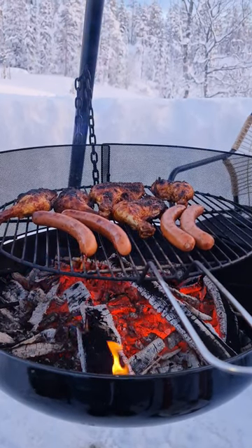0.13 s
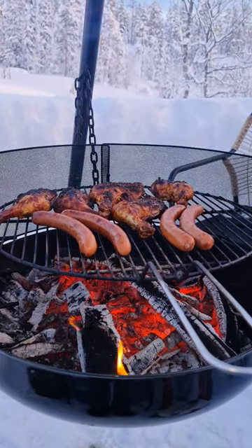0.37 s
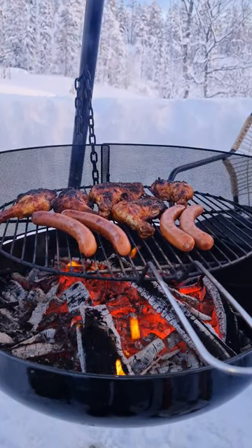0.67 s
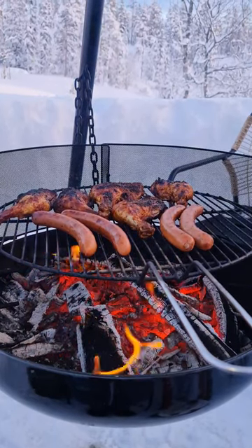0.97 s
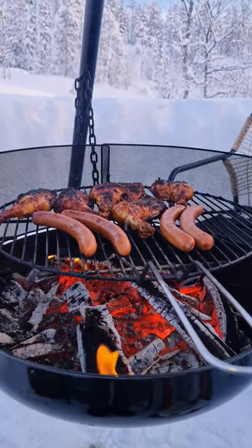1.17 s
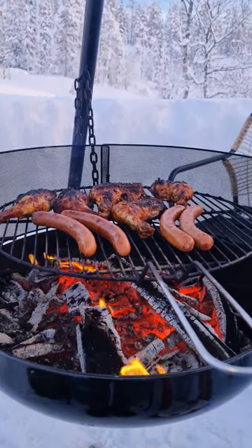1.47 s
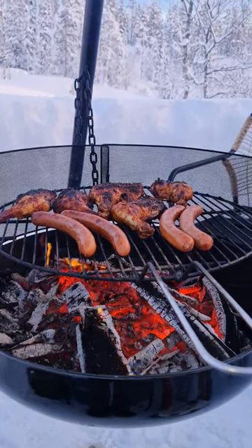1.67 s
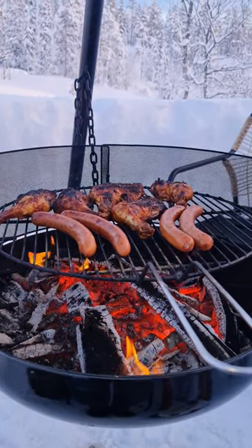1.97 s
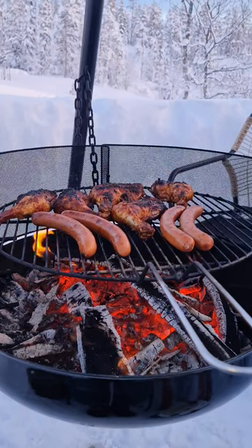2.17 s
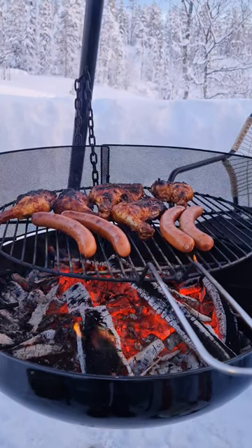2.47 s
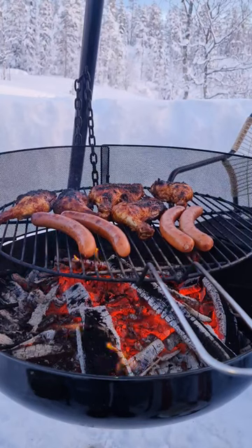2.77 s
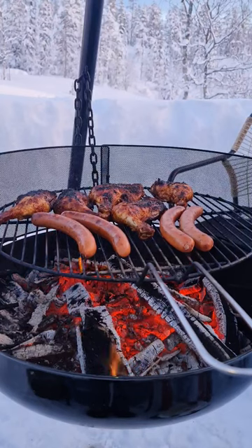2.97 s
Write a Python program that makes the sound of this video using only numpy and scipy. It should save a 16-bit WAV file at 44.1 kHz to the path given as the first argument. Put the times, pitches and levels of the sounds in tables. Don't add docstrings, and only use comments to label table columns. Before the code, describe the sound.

Crackling fire close by, with sharp wood snaps, spitting fat and soft low flame flutter

```python
import sys
import numpy as np
from scipy import signal
from scipy.fft import rfft, irfft, next_fast_len
from scipy.io import wavfile

SR = 44100
rng = np.random.default_rng(int(sys.argv[2]) if len(sys.argv) > 2 else 0)


def pcm_store(signal):
    levels = np.round(np.clip(np.atleast_2d(signal), -1, 1) * 32767)
    wavfile.write(sys.argv[1], SR, levels.astype(np.int16).T)


def nominal_scale(level):
    x = np.asarray(level, float) / 20
    return 10 ** x


N = 137151

# [t/s, level/dB]
SIZZLE_LEVEL = [(0.0, -63.5), (0.07, -58.5), (0.15, -62), (0.6, -62.5), (0.85, -61.5), (1.23, -63),
                (1.6, -61.5), (2.1, -62), (2.45, -63.5), (2.55, -62), (2.7, -60.5), (2.93, -63.5),
                (3.11, -56.5)]
# [f/Hz, density/dB per Hz]
SIZZLE_SPECTRUM = [(350, -32), (500, -1), (708, -7), (1300, -6), (3110, -4), (6800, -3), (12000, -3.5),
                   (16200, -1.5)]
# [t/s, peak level/dB, length/s, extra rumble level/dB]
PUFFS = [(0.06, -58.5, 0.015, -24), (0.472, -67, 0.012, 7), (0.53, -59, 0.024, 14.5),
         (0.613, -64, 0.0077, 18), (0.654, -49.5, 0.018, 5), (0.788, -52, 0.03, 5), (1.002, -62, 0.015, 10),
         (1.067, -55.5, 0.023, -1), (1.15, -49, 0.017, 5), (1.232, -71, 0.034, 14.5),
         (1.331, -55, 0.012, 2), (1.362, -52, 0.013, -9), (1.404, -60, 0.024, 4), (1.511, -46, 0.037, 2),
         (1.569, -52, 0.015, -5), (1.627, -50.5, 0.017, 4), (1.675, -47, 0.0077, 9.5),
         (1.751, -52.5, 0.014, 0), (1.893, -54.5, 0.033, -6), (2.087, -55, 0.023, -17),
         (2.162, -55.5, 0.064, -23), (2.277, -45, 0.0057, -4), (2.36, -63, 0.028, 5),
         (2.525, -59, 0.069, 8), (2.627, -57, 0.019, 13.5), (2.74, -62, 0.034, 6), (2.802, -59, 0.041, 10),
         (2.843, -59, 0.071, 5), (2.984, -51.5, 0.023, 4), (3, -42, 0.094, -22)]
# [f/Hz, density/dB per Hz]
RUMBLE_SPECTRUM = [(20, -13), (50, 4), (110, 0), (160, -7), (350, -5), (700, -49), (1500, -14)]
# [t/s, spray level/dB, snap level/dB, log knock level/dB, bowl thump level/dB]
CRACKS = [(0.1753, -36, -60, -58, -55.5), (0.1907, -31.5, -62, -65, -38.5), (0.1922, -25, -41, -52, -40),
          (0.2001, -33, -49, -72, -62), (0.2509, -31.5, -61, -87, -64), (0.9714, -31.5, -48, -78, -52),
          (1.116, -35, -49.5, -39.5, -46.5), (1.4818, -35, -50, -74, -78), (1.485, -33.5, -47, -58, -56),
          (1.4944, -33.5, -35.5, -39.5, -36.5), (1.502, -51, -48, -54, -69), (1.649, -35, -52, -73, -66),
          (1.6831, -44.5, -53, -64, -61), (1.7914, -36, -45.5, -60, -52.5), (2.0357, -47, -51.5, -60, -51),
          (2.0463, -26, -34.5, -41.5, -81), (2.0492, -26, -46, -67, -56),
          (2.0567, -27, -35.5, -45.5, -47.5), (2.063, -30.5, -45, -40, -46.5), (2.069, -66, -70, -45, -58),
          (2.3444, -26.5, -52, -60, -87), (2.35, -47, -51, -62, -66), (2.9634, -36, -49, -63, -70),
          (3.0659, -70, -56, -53.5, -34)]
# [t/s, peak level/dB, snap level re peak/dB]
SPITS = [(0.1595, -47, -24), (0.385, -47.5, -15), (0.4257, -48, -39), (0.4512, -41, -19),
         (0.5287, -52, -33), (0.5848, -49, -15), (0.598, -40.5, -11), (0.63, -46.5, -23),
         (0.6835, -41.5, -11), (0.7085, -48.5, -11), (0.7469, -38.5, -16.5), (0.8002, -46.5, -10),
         (0.8968, -49, -29), (0.915, -51.5, -30), (1.0456, -45.5, -18), (1.285, -43, -15),
         (1.3216, -46.5, -32), (1.7764, -64, 5), (1.8578, -41.5, -16), (1.9270, -49, -10.5),
         (1.9919, -44, -14), (2.1144, -56, 3), (2.1985, -44.5, -8.5), (2.2585, -49.5, -18),
         (2.4186, -46.5, -20), (2.5183, -41, -10.5), (2.5306, -39, -38), (2.5702, -40, -16.5),
         (2.6004, -39.5, -12.5), (2.6328, -43.5, -37)]
# [t/s, peak level/dB, snap level re peak/dB]
MORE_SPITS = [(0.4344, -51, -28), (0.402, -47, -18), (0.614, -59, -3), (0.735, -48, -22),
              (1.5878, -56, -18), (2.149, -49, -17), (2.232, -50, -6.5), (2.7151, -40, -30),
              (2.752, -45, -32), (2.834, -47, -20), (2.894, -55, -3.5), (2.9837, -41.5, -20),
              (3.0397, -44, -14)]
# [f/Hz, density/dB per Hz]
SPRAY_SPECTRUM = [(3000, -10), (5000, -5.5), (7000, -6.5), (9000, -3), (13000, -1), (16000, -4.5)]
# [f/Hz, level/dB, t60/s]
SNAP_MODES = [(1600, 1, 0.0029), (2220, -5, 0.0096), (2687, -0.5, 0.0054), (4000, -2, 0.0027)]
# [f/Hz, level/dB, t60/s]
LOG_MODES = [(544, -3.5, 0.015), (1051, -2.5, 0.023), (1797, -21.5, 0.062)]
# [f/Hz, level/dB, t60/s]
BOWL_MODES = [(269, -1.5, 0.021), (374, -1.5, 0.051), (524.4, -21, 0.087)]
# [t/s, peak level/dB, f/Hz, t60/s]
BURSTS = [(0.176, -47, 2500, 0.0025), (0.1931, -41.5, 1450, 0.011), (.1929, -39, 730, 0.0059),
          (.2517, -39, 2960, .002), (0.2524, -36, 11100, .003), (.586, -58, 1200, .003),
          (.685, -49.5, 1100, 0.0033), (0.972, -53, 600, .008), (.9725, -56, 1150, .006),
          (1.1175, -44, 1840, 0.011), (1.4946, -25.5, 1710, 0.008), (1.4952, -36, 3550, 0.0037),
          (1.4953, -48.5, 585, 0.024), (1.117, -41.5, 8300, 0.0071), (3.068, -49, 750, 0.016),
          (2.4203, -37, 14400, .002), (1.6496, -49, 1700, 0.0041), (1.792, -45, 634, 0.0071),
          (2.0366, -46, 2000, 0.0026), (2.0471, -52, 2700, 0.0017), (2.0637, -33.5, 2820, 0.0042),
          (2.3472, -40.5, 2790, 0.017), (2.3460, -42, 2200, 0.016), (2.45, -52.5, 800, 0.0089),
          (2.86, -51, 776, 0.0075), (3.04, -51.5, 1130, 0.0077)]
# [t/s, depth/dB]
FLAPS = [(.478, -57.5), (0.5394, -60), (0.554, -60), (.646, -59), (.657, -52.5), (0.6685, -53),
         (0.678, -55.5), (0.771, -56.5), (.8025, -52.5), (0.8118, -56), (0.8339, -55.5), (1.0004, -55),
         (1.012, -57), (1.0778, -58), (1.155, -53), (1.334, -56), (1.3737, -53), (1.5253, -46.5),
         (1.5433, -53), (1.5685, -52), (1.5805, -50.5), (1.6339, -52.5), (1.6515, -56), (1.6587, -66),
         (1.6797, -52.5), (1.7613, -56), (1.908, -59), (2.079, -59), (2.278, -55.5), (2.3659, -59),
         (2.5428, -60), (2.5604, -56.5), (2.5729, -58), (2.6026, -59), (2.6314, -50), (2.639, -55),
         (2.652, -54.5), (2.7572, -57.5), (2.8092, -51.5), (2.8586, -60), (2.9848, -60), (3.015, -52)]
# [f/Hz, correlation/0-1]
PORT_LIKENESS = [(40, 0.43), (150, 0.93), (400, 0.48), (1400, 0.2), (3000, 0.29), (7000, 0), (15000, 0.03)]
# [f/Hz, left minus right/dB]
PORT_BALANCE = [(60, -0.5), (400, -5), (700, -8), (1290, 8), (2380, -9), (4400, -2.5), (8120, -4.5),
                (15000, -12)]
# [f/Hz, width/Hz, depth/0-1]
RESPONSE_DIPS = [(718, 125, 0.51), (1324, 140, 0.52), (6900, 210, 0.38)]


def rms_one(x):
    return x / np.sqrt(np.mean(x ** 2) + 1e-20)


def in_time(rows):
    return np.interp(np.arange(N) / SR, *np.transpose(rows))


def at_hz(points, hz):
    point_hz, value = np.transpose(points)
    return np.interp(np.log(hz), np.log(point_hz), value)


def bandpass(x, order, low_hz, high_hz):
    return signal.sosfilt(signal.butter(order, [low_hz, high_hz], "band", fs=SR, output="sos"), x)


def drift(rate_hz):
    pole = np.exp(-2 * np.pi * rate_hz * 40 / SR)
    noise = rng.standard_normal(N // 40 + 2002)
    slow = signal.lfilter([1], [1, -2 * pole, pole * pole], noise)[2000:]
    return np.interp(np.arange(N) / 40, np.arange(len(slow)), rms_one(slow))


def train(t_s, level_db):
    out = np.full(N, 1e-18)
    index = np.clip((np.asarray(t_s) * SR).astype(int), 0, N - 1)
    np.add.at(out, index, nominal_scale(level_db))
    return out


def dying(clicks, t60_s):
    return signal.lfilter([1], [1, -nominal_scale(-60 / (t60_s * SR))], clicks)


def ring(x, modes):
    out = 0
    for k, (hz, level_db, t60_s) in enumerate(modes):
        pole, w = nominal_scale(-60 / (t60_s * SR)), 2 * np.pi * hz / SR
        gain = nominal_scale(level_db) * np.sin(w) * (-1) ** k
        out = out + signal.lfilter([0, gain], [1, -2 * pole * np.cos(w), pole * pole], x)
    return out


def bands(spectrum, patchy_db, rate_hz):
    out, together = 0, drift(rate_hz / 4)
    bottom_hz, top_hz = spectrum[0][0], spectrum[-1][0]
    edges_hz = np.geomspace(bottom_hz, top_hz, num=int(3 * np.log2(top_hz / bottom_hz)) + 2)
    white = rng.standard_normal((2, 2, N))
    for k, (low_hz, high_hz) in enumerate(zip(edges_hz, edges_hz[1:])):
        mid, side = bandpass(white[k % 2], 2, low_hz, high_hz)
        center_hz = np.sqrt(low_hz * high_hz)
        alike = np.clip(at_hz(PORT_LIKENESS, center_hz), 0, 1)
        flicker_db = patchy_db * (0.6 * together + drift(rate_hz))
        gain = nominal_scale(at_hz(spectrum, center_hz) + flicker_db)
        out = out + gain * (np.sqrt(1 + alike) * mid + np.sqrt(1 - alike) * side * [[1], [-1]])
    return rms_one(out)


def sizzle():
    level_db = in_time(SIZZLE_LEVEL) + 1.0 + 0.17 * drift(120)
    return nominal_scale(level_db) * bands(SIZZLE_SPECTRUM, patchy_db=0.0, rate_hz=17.0)


def flames():
    steady_db, puff_db, rumble_db = -72, -12, -15.5
    t, gust, deep = np.arange(N) / SR, np.zeros(N), nominal_scale(steady_db)
    for start_s, level_db, length_s, extra_db in PUFFS:
        u = np.maximum(t - start_s, 0) / max(length_s, 0.004)
        shape = 4 * u * np.exp(-2 * u ** 1.05)
        gust = gust + nominal_scale(level_db + puff_db) * shape
        deep = deep + nominal_scale(level_db + extra_db + rumble_db) * shape
    air = rng.standard_normal(N) + 0.69 * rng.standard_normal((2, N))
    air = bandpass(air * nominal_scale(1.6 * drift(44)), 3, 140, 520)
    puffs = rms_one(rms_one(air) + 1.6 * rms_one(ring(air, BOWL_MODES[:2])))
    return gust * puffs + deep * bands(RUMBLE_SPECTRUM, patchy_db=0.0, rate_hz=44)


def vapour_spray(t_s, level_db, ticks):
    lag_s, rise_s, spray_db = 0.0014, 0.00044, -9.5
    t60_s, tail_t60_s, tail_db = 0.0033, 0.027, -8.5
    lead_s, lead_db, spit_tail_share = 0.0011, -14, 0.6
    tail_share = np.where(np.arange(len(t_s)) < len(CRACKS), 1, spit_tail_share)
    jets = train(t_s + lag_s, level_db + spray_db) + ticks
    tails = train(t_s + lag_s, level_db + spray_db + tail_db + 20 * np.log10(tail_share))
    lead = nominal_scale(lead_db) * dying(jets[::-1], 7 * lead_s)[::-1]
    rise = np.exp(-1 / (rise_s * SR))
    decay = dying(jets, t60_s) + dying(tails, tail_t60_s)
    envelope = 2 * signal.lfilter([1 - rise], [1, -rise], decay) + lead
    return envelope * bands(SPRAY_SPECTRUM, patchy_db=-1.5, rate_hz=69)


def snaps(t_s, level_db, ticks):
    onset_s, snap_db, rattle_t60_s = 0.00066, 0.5, 0.015
    hits = train(t_s + onset_s, level_db + snap_db) + 0.26 * ticks
    noise = rng.standard_normal(N) + 1.95 * rng.standard_normal((2, N))
    rattle = 0.11 * dying(hits, rattle_t60_s) * noise
    highpass = signal.butter(2, 1300, "high", fs=SR, output="sos")
    return signal.sosfilt(highpass, ring(hits + rattle, SNAP_MODES))


def knocks_and_thumps():
    onset_s, thump_db = 0.00066, -1
    t_s, _, _, knock_level_db, thump_level_db = np.transpose(CRACKS)
    knocks = ring(train(t_s + onset_s, knock_level_db), LOG_MODES)
    thumps = ring(train(t_s + onset_s, thump_level_db + thump_db), BOWL_MODES)
    return knocks * nominal_scale(np.array([[2.5], [-2.5]])) + bandpass(thumps, 2, 170, 600)


def pops():
    spit_db = 6
    ticks_per_s, tick_db, tick_spread_db = 290, -66, 4.5
    spits = [(t_s, peak_db + spit_db, peak_db + snap_db)
             for t_s, peak_db, snap_db in list(SPITS) + list(MORE_SPITS)]
    t_s, spray_db, snap_db = np.transpose([row[:3] for row in CRACKS] + spits)
    is_tick = rng.random(N) < ticks_per_s / SR
    ticks = is_tick * nominal_scale(tick_db + tick_spread_db * np.minimum(rng.exponential(1, N), 2))
    return vapour_spray(t_s, spray_db, ticks) + snaps(t_s, snap_db, ticks) + knocks_and_thumps()


def bursts():
    out = 0
    for t_s, level_db, hz, t60_s in BURSTS:
        out = out + ring(train([t_s], [level_db]), [(hz, 0, max(t60_s, 0.001))])
    return out * nominal_scale(np.array([[-1.5], [1.5]]))


def flaps():
    beat_hz, beat_s = 257.6, 0.0016
    t = np.arange(-400, 401) / SR
    beat = -np.cos(2 * np.pi * beat_hz * t) * np.exp(-0.5 * (t / beat_s) ** 2)
    return signal.fftconvolve(train(*np.transpose(FLAPS)), beat, "same")


def scene():
    return pops() + flames() + sizzle() + bursts() + flaps()


def band_limit(x):
    return signal.sosfilt(signal.butter(12, 16790, fs=SR, output="sos"), x)


def record(dry):
    peak_top = 0.11
    size = next_fast_len(N + 4096)
    hz = np.maximum(np.fft.rfftfreq(size, 1 / SR), 1)
    dips = 1
    for dip_hz, width_hz, depth in RESPONSE_DIPS:
        dips = dips * (1 - np.clip(depth, 0, 0.9) / (1 + ((hz - dip_hz) / width_hz) ** 2))
    top_cut = np.where(hz < 15600, 1, nominal_scale(-38)) * (hz < 16700)
    ports = nominal_scale(at_hz(PORT_BALANCE, hz) / 2 * [[1], [-1]])
    x = irfft(rfft(dry, size) * dips * top_cut * ports, size)[:, :N]
    mix = peak_top * np.tanh(x / peak_top)
    return band_limit(mix)


dry = scene()
out = record(dry)
pcm_store(out)
```